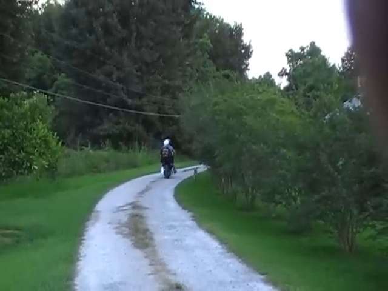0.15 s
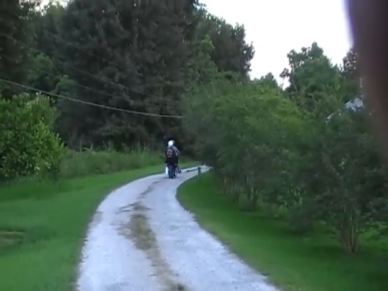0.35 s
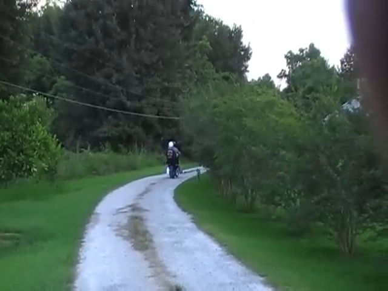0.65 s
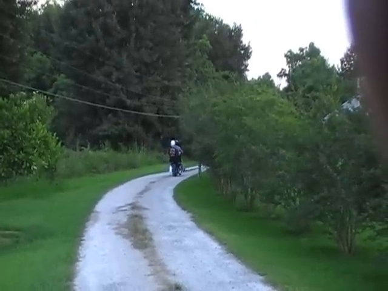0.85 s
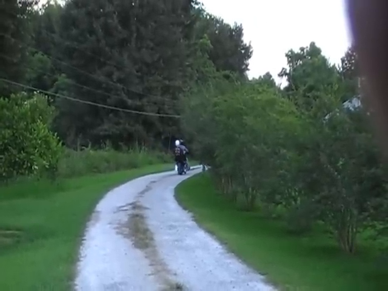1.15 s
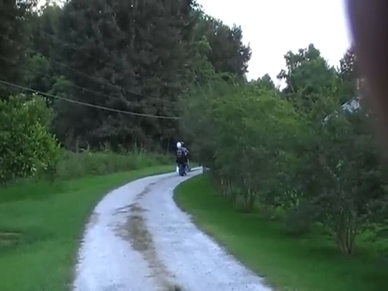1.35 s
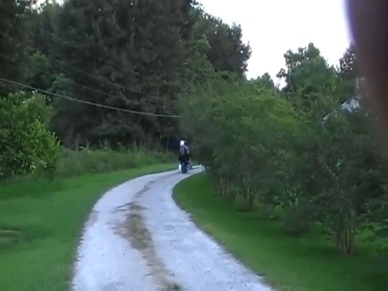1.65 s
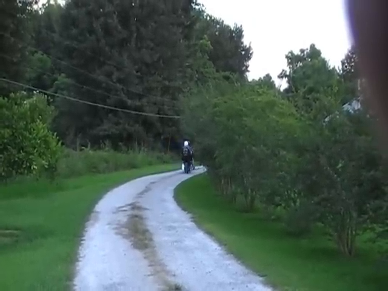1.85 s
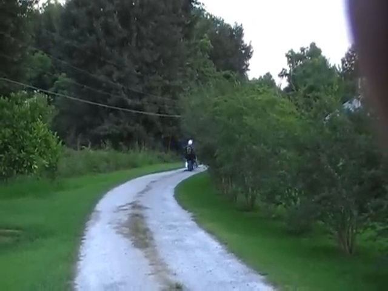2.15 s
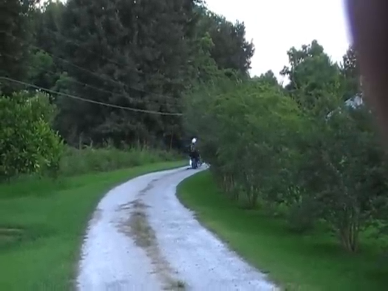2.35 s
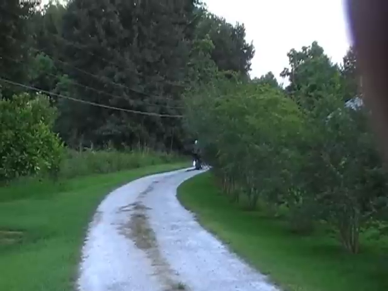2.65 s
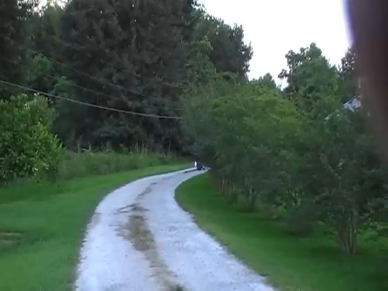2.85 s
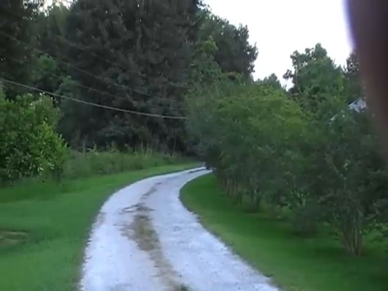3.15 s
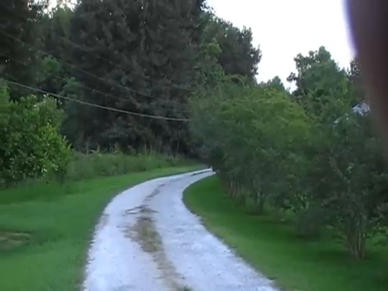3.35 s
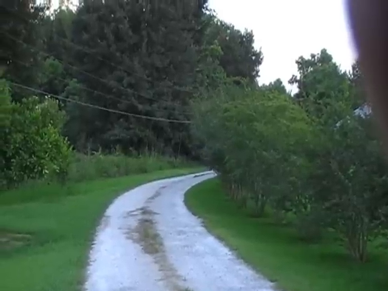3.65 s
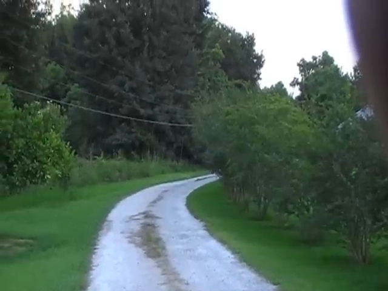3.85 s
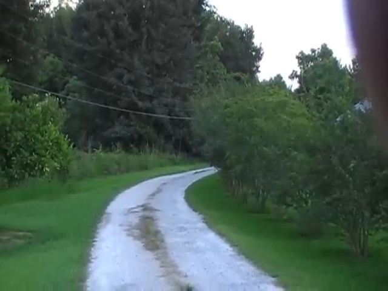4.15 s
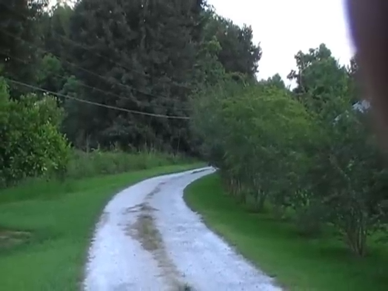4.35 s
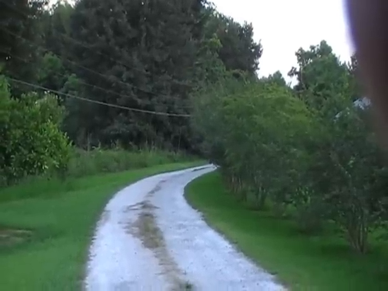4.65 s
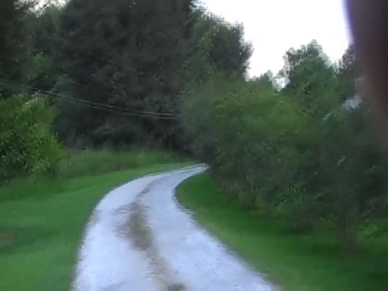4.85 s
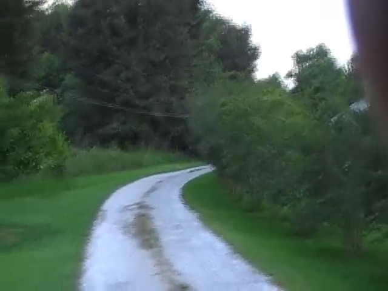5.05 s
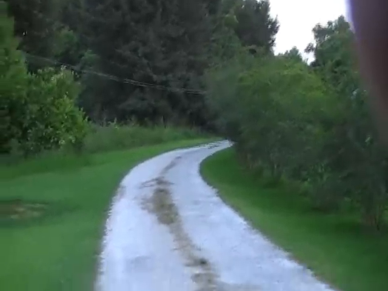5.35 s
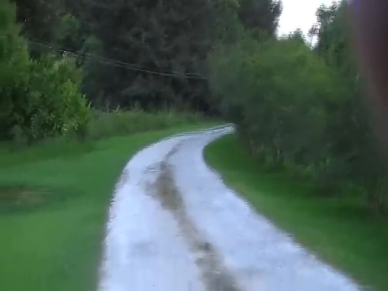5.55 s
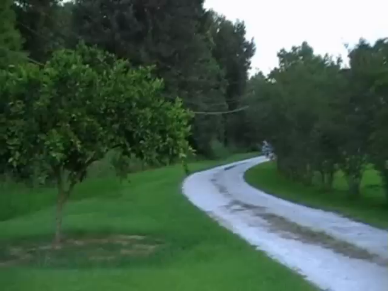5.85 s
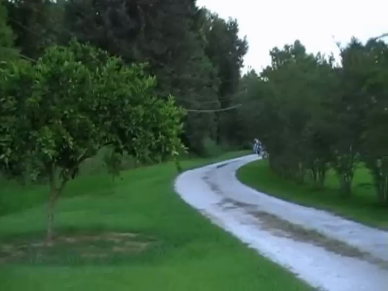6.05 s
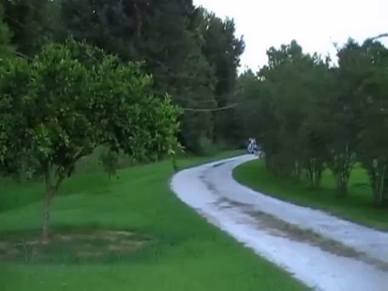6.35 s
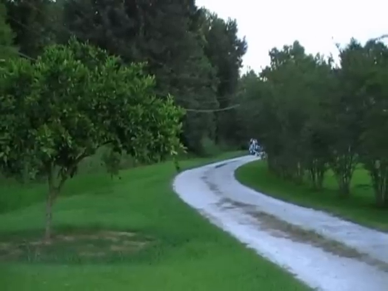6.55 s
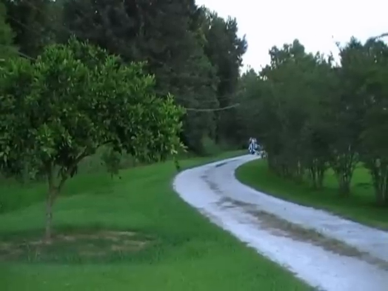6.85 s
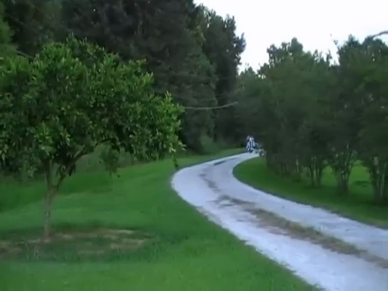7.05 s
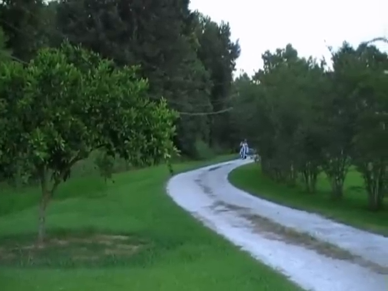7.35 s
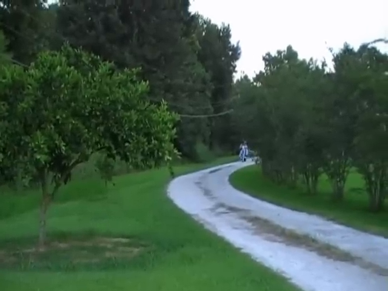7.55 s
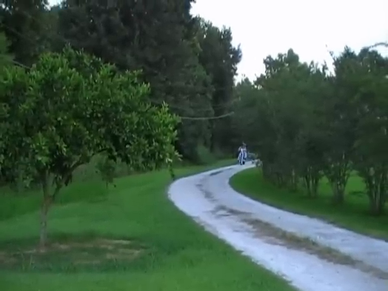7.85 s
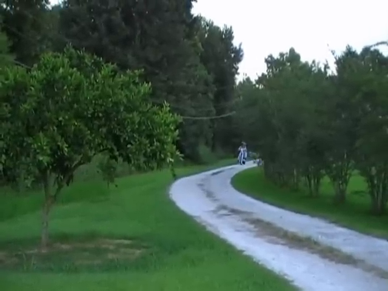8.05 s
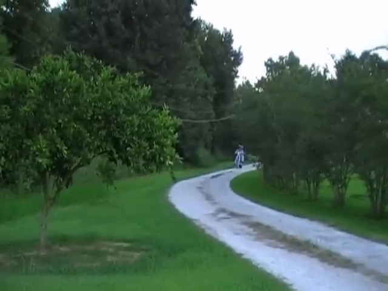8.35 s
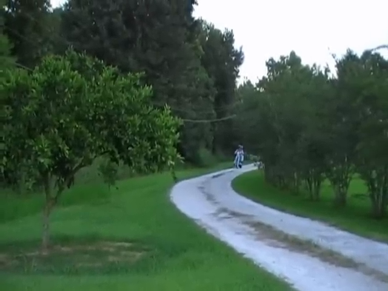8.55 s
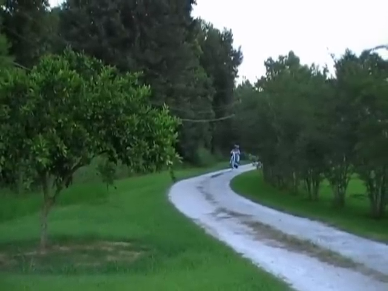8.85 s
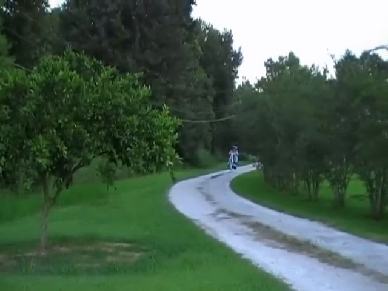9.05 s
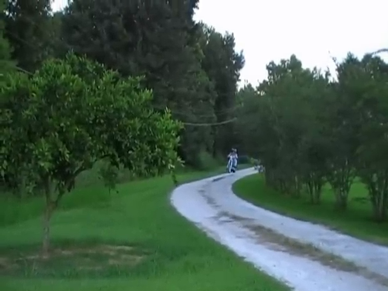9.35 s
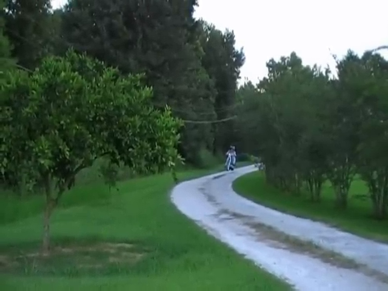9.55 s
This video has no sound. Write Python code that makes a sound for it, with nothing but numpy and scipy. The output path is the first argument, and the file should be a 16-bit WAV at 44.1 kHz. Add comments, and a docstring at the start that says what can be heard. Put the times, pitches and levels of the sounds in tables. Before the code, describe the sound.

Uneven lumpy motorcycle firings recede down a gravel lane, cut abruptly to a distant soft engine that swells with throttle, falls and rises again.

```python
"""V-twin chopper on a gravel lane

A V-twin chugs away at low revs between trees, its uneven pairs of firings timed by the engine speed.
Each firing is a bark, a thump and a crack of gas, shaped from noise and pipe resonances; the intake gulps.
Tyres crunch over an engine drone, with hedge calls, an insect trill and brushes on the microphone body.
After a short silence the bike is far off: soft booms and barks through the trees, an opening throttle
that makes them rasp, an outdoor hiss, and at last the ticking valve gear."""
import sys
import numpy as np
from scipy import signal
from scipy.fft import rfft, irfft, next_fast_len
from scipy.io import wavfile
from scipy.ndimage import uniform_filter1d, map_coordinates

SR = 44100
rng = np.random.default_rng(int(sys.argv[2]) if len(sys.argv) > 2 else 0)


def generate_wav(signal):
    """Clip the signal to [-1, 1] and save it as 16-bit WAV at the path in sys.argv[1]."""
    frames = np.transpose(np.atleast_2d(signal))
    scaled = np.clip(frames, -1, 1) * 32767
    pcm = np.round(scaled).astype(np.int16)
    wavfile.write(sys.argv[1], SR, pcm)


N = 427769
TIME = np.arange(N) / SR
SIZE = 4096  # samples in one short sound
AGE = np.arange(SIZE) / SR  # seconds into a short sound
BREAK = (5.92, 5.951)  # silence between the near and the far scene (s)
TOP_HZ = 15900

# Tone of the slug of gas leaving the pipes. Each row: frequency in Hz, relative level in dB.
THUMP_TONE = [(20, -39), (42, -10.5), (62, -4.5), (100, 3.5), (135, -1.5), (190, 0), (270, -4.5),
              (350, -4.5), (440, -14.5), (700, -32), (2000, -63.5)]
# Tone of the bark straight behind the pipes. Each row: frequency in Hz, relative level in dB.
BARK_BEHIND_TONE = [(150, -33), (480, -9.5), (670, 3), (740, -2), (810, 2.5), (865, -4), (925, -7.5),
                    (1030, -20.5), (1190, -24.5), (1500, -22), (3500, -33), (7000, -97)]
# Tone of the bark past the bend. Each row: frequency in Hz, relative level in dB.
BARK_ASIDE_TONE = [(150, -40.5), (510, -10), (650, 1), (730, -3.5), (790, 2.5), (860, -7.5), (945, -1),
                   (1030, -9.5), (1180, -27), (1500, -22), (3500, -25), (7000, -85)]
# Upper pipe resonances. Each row: frequency in Hz, relative level in dB.
BLARE_TONE = [(1000, -41), (1250, -8), (1520, -1), (1720, -4), (1920, -11), (2250, -1.5), (2600, -11),
              (3400, -21), (7000, -70)]
# Loudness of the blare. Each row: time in seconds, level in dB.
BLARE_LEVEL = [(0, -42.5), (.9, -41), (1.3, -43), (2, -50), (3.6, -49.5), (4.5, -49), (5.9, -48)]
# Tone of the crack straight behind the pipes. Each row: frequency in Hz, relative level in dB.
CRACK_BRIGHT_TONE = [(880, -48), (1500, -2), (1960, -10), (2300, -5), (3000, -7), (4780, 0.5), (5940, 1),
                     (6890, 5), (9280, 4.5), (11500, -7), (14500, -11.5), (16000, -20)]
# Tone of the crack round the bend. Each row: frequency in Hz, relative level in dB.
CRACK_DULL_TONE = [(880, -38), (1500, -25), (1920, -2), (2270, 4), (2910, 9), (4780, 12.5), (5830, 8),
                   (6500, 10.5), (8300, 7.5), (11500, -5.5), (16000, -12.5)]
# Pipe ring after every firing. Each row: frequency in Hz, level over the blow in dB, t60 in seconds.
PIPE_MODES = [(61.4, -25, 0.11), (128, -18, 0.086), (205, -15, 0.1), (336, -12.5, 0.13), (498, -21, 0.11),
              (650, -12.5, 0.059), (793, -13.5, 0.18), (942, -15.5, 0.11)]
# Inlet ring as the throttle opens. Each row: time in seconds, level over the gulp in dB.
INLET_RING_LEVEL = [(0, -12), (3.5, -13), (4.6, -0.5), (5.9, -5.5), (6, -12)]

# Engine speed chugging away. Each row: time in seconds, speed in rpm.
NEAR_SPEED = [(0.02, 1064.4), (0.19, 959.3), (0.35, 1042.6), (0.82, 1003.3), (1.33, 1030.0), (1.7, 1085.6),
              (2.04, 1046.1), (2.5, 1054.2), (2.63, 980.2), (2.84, 1142.6), (2.95, 980.6), (3.22, 1078.3),
              (3.33, 978.3), (3.66, 1019.5), (3.8, 994.3), (4.27, 1073.6), (4.5, 1049.8), (5.92, 1134.5)]
# Engine speed revving far off. Each row: time in seconds, speed in rpm.
FAR_SPEED = [(5.97, 1041.3), (6.6, 1165.9), (7.0, 1488.8), (7.18, 1740.6), (7.46, 1959.2), (8.14, 1583.1),
             (8.57, 1421.1), (8.7, 1294.6), (9.3, 1170.8), (9.7, 1740.6)]
# Firings that miss or burn hard. Each row: time in seconds, change of thump or boom in dB,
# change of crack or far bark in dB; the near bark takes the mean of both changes.
ODD_FIRINGS = [(.137, -3, 2), (.258, 0.5, 2), (.308, 1, 3.5), (.658, -2.5, -5), (1.085, -2, -0.5),
               (1.247, -6, -2), (1.317, -1, 3), (1.48, -4, -4.5), (1.883, 0.5, 3), (2.04, -8, -5.5),
               (2.34, -2.5, 2), (2.389, 1.5, 3.5), (2.502, 2.5, -5), (2.8, 2.5, 2.5), (2.909, 1, 1.5),
               (3.03, -1.5, 3), (3.146, 1.5, 1), (3.194, -1, 1), (3.31, -3, -1.5), (3.546, -11, -10),
               (3.62, 0, 2.5), (3.671, 0.5, 3), (3.977, 0, 5), (4.252, 2.5, 3.5), (5.436, -3, 3),
               (5.758, -2, -2.5), (5.803, 0.5, -3), (6.985, -3, -3), (7.14, 2, -2), (7.207, 1, 1),
               (7.41, -1, 3), (7.725, -4, -1), (8.142, 0.5, -6), (8.295, -1.5, -4), (8.457, -2, -17),
               (8.49, 7.5, 5), (8.54, 3, -1), (8.575, 0, -14), (8.624, -10, -18), (8.662, 3, 2),
               (8.905, -21, -24), (8.945, 4, 1), (9.04, -7, -13), (9.2, 3.5, 5), (9.435, 4, 2),
               (9.52, 3, 3), (9.598, 5, 2.5), (9.64, 1, 1)]
# The pipes as the bike recedes and swings with the bends. Each row: time in seconds, thump in dB,
# bark in dB before a trim, crack in dB, second pipe's crack over the first in dB, turned away from 0 to 1.
LEAVING = [(0, -22.5, -27, -33.5, 0.5, 0.22), (.85, -25.5, -28.5, -30, -1.5, 0.28),
           (1.11, -24.5, -29, -26, -1, 0.09), (1.65, -24, -34, -30, -2, 0.28),
           (2.15, -25.5, -37.5, -35.5, 0, 0.77), (2.6, -26, -36.5, -34, -4, 0.65),
           (3.06, -24, -37.5, -31.5, -4, 0.8), (3.75, -26.5, -37.5, -33, -2, 0),
           (4.25, -25, -40, -44, -1, 0.9), (4.7, -22.5, -38.5, -40.5, 1.5, 1),
           (5.9, -24, -37.5, -38.5, -1.5, 0.55)]
# The far engine swelling with two twists of the throttle. Each row: time in seconds, boom in dB,
# bark in dB, drone in dB; boom and drone are levels before a trim.
RETURNING = [(5.97, -49, -45.5, -43), (6.4, -45.5, -44, -43.5), (6.85, -39.5, -43, -42),
             (7.1, -36.5, -46.5, -40.5), (7.42, -34, -47, -37), (7.9, -36, -46.5, -43.5),
             (8.5, -41.5, -49, -43), (8.8, -39.5, -45.5, -46), (9.3, -43, -47.5, -44.5),
             (9.7, -34.5, -37.5, -39)]

# Tree echoes, as long waves pass through the trees. Each row: frequency in Hz, echo level in dB.
ECHO_BAND = [(150, -12), (400, -7), (900, 0)]
# Decay of the tree echoes. Each row: frequency in Hz, t60 in seconds.
TREE_DECAY = [(100, 0.095), (700, 0.42), (3000, 0.11), (10000, 0.084)]
# Near bed. Each row: time in seconds, gravel level in dB, engine drone in dB before a trim.
ROLL_LEVEL = [(0, -46.5, -31), (1.5, -47, -35.5), (3.5, -48, -35.5), (3.85, -45, -35), (4.3, -46, -38),
              (5.9, -47, -39)]
# Tone of tyres on gravel. Each row: frequency in Hz, relative level in dB.
GRAVEL_TONE = [(260, -16), (430, -8), (520, -16), (635, -5.5), (794, -7.5), (1190, -15), (1530, -13),
               (3760, -11), (5620, -15.5), (9480, -9.5), (10700, -11.5), (11500, -25.5), (14600, -22.5),
               (16000, -53)]
# Tone of the near drone. Each row: frequency in Hz, relative level in dB.
NEAR_DRONE_TONE = [(20, -45), (40, -50), (62, 4.5), (100, 3.5), (200, -19), (350, -10.5), (480, -14.5),
                   (700, -25), (1200, -48)]
# Stereo width of the noise. Each row: frequency in Hz, left-right likeness (1 is mono).
ALIKE = [(100, 0.93), (500, 0.85), (1500, 0.74), (5000, 0.75), (9000, 0.023), (14000, 0.046)]
# Band the ground reflection favours as the bike moves. Each row: time in seconds, centre in Hz, lift in dB.
GROUND_LIFT = [(0, 1900, 2.5), (1.2, 1600, 1.5), (2.0, 2400, 3), (2.6, 2600, 5), (3.1, 2900, 4),
               (3.5, 3300, 3), (3.9, 2200, 2), (4.4, 2900, 1.5), (4.9, 3700, 2.5), (5.7, 4100, 2)]

# Faint bird and insect notes. Each row: start in seconds, length in seconds, frequency in Hz,
# glide in Hz, relative level in dB.
NOTES = [(2.0985, 0.011, 1670, -120, -43), (2.95, 0.064, 1330, 2, -60), (3.223, 0.12, 1370, 0, -55),
         (6.69, 0.14, 3080, 300, -62), (6.77, 0.18, 3660, 0, -62), (7.96, 0.21, 3660, 15, -62.5),
         (7.97, 0.22, 4380, 0, -66), (8.08, 0.17, 3510, -20, -64), (9.13, 0.07, 4800, -400, -65),
         (9.17, 0.16, 3660, 50, -63), (9.2, 0.15, 4400, -20, -64)]
# Husky part of the hedge calls. Each row: start in seconds, length in seconds, level in dB.
HUSKY_CALLS = [(6.62, 0.27, -56), (7.89, 0.13, -55), (8.08, 0.23, -63), (9.048, 0.24, -56.5)]
# Fingers brushing the microphone body. Each row: start in seconds, length in seconds, centre in Hz, level in dB.
BRUSHES = [(5.805, 0.045, 810, -40.5), (5.806, 0.014, 2300, -43.5), (6.208, 0.018, 3880, -49.5),
           (6.834, 0.042, 1260, -53)]

# Loudness of the far hiss. Each row: time in seconds, level in dB before a trim.
HISS_LEVEL = [(6, -47), (7.9, -46.5), (8.3, -49), (8.95, -49), (9.2, -47.5), (9.7, -46)]
# Tone of the far hiss. Each row: frequency in Hz, relative level in dB.
HISS_TONE = [(530, -1.5), (900, -1), (1170, -8), (1500, -4.5), (1800, -10), (2300, -5.5), (2850, -5.5),
             (3300, -12.5), (3800, -10), (5500, -7.5), (7490, -9), (8350, -9), (9400, -3), (10400, -2.5),
             (11300, -21), (14400, -19.5), (16000, -45)]
# Tone of the far drone. Each row: frequency in Hz, relative level in dB.
FAR_DRONE_TONE = [(20, -45), (40, -16), (64, -0.5), (100, 1.5), (200, -17), (350, -13.5), (480, -15.5),
                  (700, -18), (1200, -42.5)]
# Tone of the far boom. Each row: frequency in Hz, relative level in dB.
FAR_BOOM_TONE = [(20, -53), (40, -37), (58, -3), (78, 4), (130, -9), (190, -4.5), (270, -6.5), (340, -3.5),
                 (430, -23.5), (700, -47), (4000, -100)]
# Tone of the far bark. Each row: frequency in Hz, relative level in dB.
FAR_BARK_TONE = [(250, -25), (470, -10), (590, -3.5), (655, 5), (760, -16), (950, -21.5), (1400, -31),
                 (4000, -45)]
# The far bike's path. Each row: time in seconds, scale of echo and resonance, rasp over the bark in dB.
FAR_PATH = [(6.0, 0.14, -29), (6.7, 0.23, -17), (6.85, 0.76, -23), (7.3, 1, -13), (8.6, 1, -37),
            (9.2, 1, -13.5), (9.7, 0.66, -11)]
# Pipe note hanging on at high revs. Each row: time in seconds, level over the untrimmed boom in dB.
FAR_HUM_LEVEL = [(6, -12), (6.9, -14), (7.2, -2), (7.5, -9.5), (8.2, -7), (8.8, -16), (9.7, -9)]
# Note of the far bark, climbing as the throttle opens. Each row: time in seconds, frequency in Hz.
FAR_RING_PITCH = [(6, 650), (7.2, 630), (9.0, 639), (9.3, 696), (9.7, 715)]
# Valve gear, heard once the engine faces the listener. Each row: start in seconds, level in dB.
TICKS = [(9.381, -50), (9.422, -54), (9.472, -50.5), (9.510, -54), (9.552, -47), (9.584, -57), (9.626, -50),
         (9.657, -55)]
# Difference between the microphone ports. Each row: frequency in Hz, left minus right in dB.
PORTS = [(40, 0.5), (130, -2.4), (250, -2), (600, -3), (1200, -1.5), (5000, -0.4), (9000, 0)]

NEAR_SPAN, FAR_SPAN = (.0174, 5.92), (5.972, 9.69)  # first firing and end of each scene (s)
PAIR_GAP = .42  # the second cylinder fires this share of a cycle after the first
SECOND_THUMP_DB, SECOND_BARK_DB = -1.5, -6.5  # the second cylinder is the weaker one
FAR_SECOND_BOOM_DB, FAR_SECOND_BARK_DB = -5.5, -3
LIGHT_LOAD = (7.18, 8.45)  # revving freely, the second cylinder burns hard only every third cycle and weakly otherwise (s)
CATCH_DB, WEAK_DB = 5.5, -9
SCATTER_DB, FAR_SCATTER_DB = 1.32, 1.44  # no two firings burn alike
MODE_SPLIT = (380, 480)  # the thump drives the modes below, the bark those above (Hz)
MODE_SCATTER = .018  # the gas is never equally hot, so the ring varies in pitch
BEND = (3.6, 4.3)  # the bike passes behind the hedge (s)
BARK_ROUGH = .5  # turbulent part of each bark, against the clean ring
SLUG_SCATTER, BOOM_SCATTER, PUFF_SCATTER = .02, .02, .029  # spread of slug length, boom and bark pitch
JET_T60 = .09  # s
FULL_GULP_GAP_S = .06  # a shorter gap between the pairs leaves less time to gulp
TAIL_HOP = SR // 4  # the bike moves, so the echoes are new four times a second
BOOM_ECHO, BARK_ECHO = .45, .55  # scattered share of the far sounds, scaled along the path
BOOM_ATTACK_S, BOOM_HOLD_S, SECOND_HOLD_S, BOOM_T60 = .0033, .023, .012, .05  # pipe note in each far chug


def amp(db):
    """Decibels to gain."""
    return 10 ** (np.asarray(db) / 20)


def unit(x):
    """Scale to rms 1."""
    return x / np.sqrt(np.mean(x ** 2) + 1e-20)


def burst(x, length):
    """Scale to the energy of rms 1 held for length seconds."""
    return x * np.sqrt(length * SR / (np.sum(x ** 2) + 1e-20))


def along(points, hz):
    """Read (Hz, value) points on a log frequency axis."""
    f, v = np.transpose(points)
    return np.interp(np.log(hz + 1), np.log(f + 1), v)


def at(rows, times):
    """Each column of a curve at the given times."""
    s, *columns = np.transpose(rows)
    return [np.interp(times, s, column) for column in columns]


def curves(rows):
    """One value per sample for each column after the time."""
    return at(rows, TIME)


def wobble(rate):
    """A smooth random curve with rate knots a second."""
    knots = rng.standard_normal(int(N * rate / SR) + 4)
    return map_coordinates(knots, [TIME * rate])


def filtered(x, response):
    """Shape x with a gain that depends on frequency."""
    m = next_fast_len(N + SR // 2)
    return irfft(rfft(x, m) * response(np.fft.rfftfreq(m, 1 / SR)), m)[..., :N]


def ring(spectrum):
    """The minimum-phase impulse response of a tone: all its energy comes as early as it can."""
    level = along(spectrum, np.fft.rfftfreq(SIZE, 1 / SR))
    cepstrum = irfft(np.log(amp(level)))
    cepstrum[1:SIZE // 2] *= 2
    cepstrum[SIZE // 2 + 1:] = 0
    return irfft(np.exp(rfft(cepstrum)))


def through(x, response):
    """A short sound through an impulse response."""
    return signal.fftconvolve(x, response)[:SIZE]


def scatter(t60):
    """A fresh cloud of dying echoes with energy 1."""
    cloud = rng.standard_normal(SIZE) * amp(-60 * AGE / t60)
    return cloud / np.linalg.norm(cloud)


def note(hz, t60, attack):
    """One dying resonance with energy 1."""
    envelope = amp(-60 * AGE / t60) * (1 - np.exp(-AGE / attack))
    return burst(np.sin(2 * np.pi * hz * AGE) * envelope, 1 / SR)


def add(track, s, sound):
    """Mix a sound into the track at s seconds."""
    start = int(np.clip(round(s * SR), 0, N))
    track[start:start + len(sound)] += sound[:N - start]


def rush(spectrum):
    """Stereo noise of rms 1, nearly mono in the bass."""
    def mid_side_gain(hz):
        turn = np.arccos(np.clip(along(ALIKE, hz), -1, 1)) / 2
        return amp(along(spectrum, hz)) * [np.cos(turn), np.sin(turn)]
    mid, side = filtered(rng.standard_normal((2, N)), mid_side_gain)
    return unit(np.array([mid + side, mid - side]))


def firings(speed, span):
    """Time, cycle, cylinder (0 or 1), low and high dB change per firing: an uneven pair per two crank turns."""
    cycles = np.cumsum(curves(speed)[0]) / (120 * SR)  # rpm to two-turn cycles
    cycles = cycles - np.interp(span[0], TIME, cycles)
    cycle, second = np.divmod(np.arange(2 * int(cycles[-1] + 1)), 2)
    s = np.interp(cycle + PAIR_GAP * second, cycles, TIME)
    extra = np.zeros((2, len(s)))
    for when, low_db, high_db in ODD_FIRINGS:
        if span[0] < when < span[1]:
            extra[:, np.argmin(abs(s - when))] += low_db, high_db
    return [column[s < span[1]] for column in (s, cycle, second, *extra)]


def near_beats():
    """Rows (s, thump dB, bark dB, crack dB, turned away) of the receding bike's firings."""
    s, _, second, low, high = firings(NEAR_SPEED, NEAR_SPAN)
    thump, bark, crack, second_crack, turned = at(LEAVING, s)
    thump = thump + low + second * SECOND_THUMP_DB
    bark = bark + (low + high) / 2 + second * SECOND_BARK_DB
    crack = crack + high + second * second_crack
    levels = np.array([thump, bark, crack]) + SCATTER_DB * rng.standard_normal((len(s), 3)).T
    return np.transpose([s, *levels, np.clip(turned, 0, 1)])


def pipe_ring(thump_db, bark_db):
    """The same standing waves ring on in the pipes after every firing."""
    hz, db, t60 = np.transpose(PIPE_MODES)[:, :, None]
    drive = np.interp(hz, MODE_SPLIT, [thump_db, bark_db]) + 2 * rng.standard_normal(hz.shape)
    hz = hz * np.exp(MODE_SCATTER * rng.standard_normal(hz.shape))
    modes = np.sum(amp(drive + db - 60 * AGE / t60) * np.sin(2 * np.pi * hz * AGE), axis=0)
    fade_in = 1 - np.exp(-AGE / .0016)
    fade_out = np.minimum(1, (AGE[-1] - AGE) * 50)
    return modes * fade_in * fade_out


def exhaust(beats):
    """The opening valve barks and blares; a slug of gas thumps out, tears into a cracking jet, rings the pipes."""
    out = np.zeros(N)
    thump, behind, aside = ring(THUMP_TONE), ring(BARK_BEHIND_TONE), ring(BARK_ASIDE_TONE)
    blare, bright, dull = ring(BLARE_TONE), ring(CRACK_BRIGHT_TONE), ring(CRACK_DULL_TONE)
    # the open end sends the slug back inverted, 2 ms later
    slug = thump - .63 * np.interp(AGE - .002, AGE, thump, left=0)
    valve = np.exp(-((AGE - .0015) / .00044) ** 2 / 2)  # the first sharp pressure wave
    jet_delay_s, jet_rise_s, jet_tail_db = .00064, .0011, -19
    jet_age = np.maximum(AGE - jet_delay_s, 0) / jet_rise_s
    jet_tail = amp(jet_tail_db - 60 * AGE / JET_T60) * (AGE > jet_delay_s)
    jet = jet_age * np.exp(1 - jet_age) + jet_tail  # tears open, then fades
    for s, thump_db, bark_db, crack_db, turned in beats:
        stretch = np.exp(rng.normal(0, SLUG_SCATTER))  # no two slugs are equally long
        add(out, s + .0026, amp(thump_db) * burst(np.interp(AGE * stretch, AGE, slug), .012))
        add(out, s - .0017, -amp((thump_db + bark_db) / 2 + 7) * valve)

        hidden = np.interp(s, BEND, [0, 1])
        pipe = burst((1 - hidden) * behind + hidden * aside, 1 / SR)
        rough = burst(through(scatter(t60=.096), pipe), 1 / SR)
        add(out, s - .0006, amp(bark_db - 1.4) * burst(BARK_ROUGH * rough - pipe, .011))
        add(out, s + .00473, pipe_ring(thump_db, bark_db))

        blast = scatter(t60=.013) + .79 * scatter(t60=.18)
        add(out, s, amp(at(BLARE_LEVEL, s)[0]) * burst(through(blast, blare), .0086))

        # the jet is a string of tiny shocks
        spiky = rng.standard_normal(SIZE) * amp(1.23 * rng.standard_normal(SIZE))
        crack = through(jet * spiky, (1 - turned) * bright + turned * dull)
        crack = amp(crack_db) * burst(crack, .009)
        add(out, s, crack)
        slap_s = .0105 * np.exp(rng.normal(0, .1))
        add(out, s + slap_s, amp(-19) * crack)  # the hedge slaps it back
    return out


def intake(beats, gulp_db, lag, overlap_db, gulp_hz, cycles, quicken):
    """In the long gap after each uneven pair, the intake gulps and rings briefly; lag is a share of the gap."""
    out, times = np.zeros(N), np.array(beats)[:, 0]
    middle = AGE - .02  # seconds from the heart of the gulp
    for before, s, after in zip(times, times[1:], times[2:]):
        if after - s > 1.15 * (s - before):
            gap = min(after - s, .07)
            fill = min(gap / FULL_GULP_GAP_S, 1) ** 2
            turns = middle * gulp_hz * np.exp(rng.normal(0, .072))
            # a short swing of air in the inlet tract, quickening as the valve shuts
            swing = np.cos(2 * np.pi * (turns + quicken * turns ** 2))
            gulp = -burst(swing * np.exp(-(turns / cycles) ** 2 / 2), .012) * fill
            add(out, s + lag * gap + middle[0], amp(gulp_db + rng.normal(0, 1)) * gulp)
            inlet = burst(note(hz=234, t60=.045, attack=.0012), .0068) * fill
            add(out, s + lag * gap + .0012, amp(gulp_db + at(INLET_RING_LEVEL, s)[0]) * inlet)
            # a smaller puff while the valves overlap
            add(out, s + .38 * gap + middle[0], amp(gulp_db + overlap_db) * gulp)
    return out


def trees(x):
    """The tree line returns a thin, ever-changing tail, different at each microphone port."""
    out = np.zeros((2, N))
    late = np.pad(filtered(x, lambda hz: amp(along(ECHO_BAND, hz))), (300, 0))  # 300 samples later
    for start in range(0, N, TAIL_HOP):
        hz, t, z = signal.stft(rng.standard_normal((2, SR // 2)), SR, nperseg=256)
        decay = amp(-60 * t / along(TREE_DECAY, hz)[:, None])
        tail = signal.istft(z * decay, SR, nperseg=256)[1]
        tail = tail + 2.1 * tail.mean(axis=0)  # the ports are close together, so they share much
        tail = tail / np.linalg.norm(tail) * np.sqrt(2)
        echo = signal.fftconvolve(late[None, start:start + TAIL_HOP], tail, axes=1)
        for port, sound in zip(out, echo):
            add(port, start / SR, sound)
    return out


def near_bed():
    """Tyres crunch on the gravel, as unsteady noise, over the engine's diffuse drone."""
    gravel_db, drone_db = curves(ROLL_LEVEL)
    grit = amp(1.6 * wobble(300) + .86 * wobble(17))
    crunch = unit(grit * rush(GRAVEL_TONE))
    return amp(gravel_db) * crunch + amp(drone_db - 5) * rush(NEAR_DRONE_TONE)


def foliage(x, patchy_db, far_patchy_db):
    """Ground and leaves lift some treble bands and shade others, slowly shifting."""
    hz, t, z = signal.stft(x, SR, nperseg=256)
    s, centre, lift_db = np.transpose(GROUND_LIFT)
    near = t < BREAK[0]
    octaves = np.log2((hz[:, None] + 1) / np.interp(t, s, centre))
    ground = np.interp(t, s, lift_db) * np.exp(-(octaves / .22) ** 2 / 2) * near
    patches = uniform_filter1d(rng.standard_normal(z.shape[1:]), size=3, axis=0)
    patches = unit(uniform_filter1d(patches, size=50, axis=1))
    treble = np.interp(hz, [800, 2000, 10000], [0, 1, .5])[:, None]
    shade = np.where(near, patchy_db, far_patchy_db) * patches * treble
    return signal.istft(z * amp(ground + shade), SR, nperseg=256)[1][:, :N]


def wildlife():
    """Short gliding tones and husky noise call from the hedge; an insect starts a thin, fluttering trill."""
    out = np.zeros(N)
    for s, length, hz, glide_hz, db in NOTES:
        count = int(length * SR)
        part = np.linspace(0, 1, count)
        pitch = (hz + glide_hz * part) * (1 + .0029 * wobble(69)[:count])
        tone = np.sin(2 * np.pi * np.cumsum(pitch) / SR)
        envelope = np.interp(part, [0, .2, 1], [0, 1, 0])
        add(out, s, 2 * amp(db + 3.2 * wobble(41)[:count]) * envelope * tone)
    husk = rush([(2800, -40), (3600, -4), (4450, 0), (5200, -7), (6500, -40)])
    calls = np.zeros(N)
    for s, length, db in HUSKY_CALLS:
        calls += amp(db) * np.sin(np.pi * np.clip((TIME - s) / length, 0, 1))
    buzz = rush([(6900, -60), (7350, -14), (7500, 15), (7640, -12), (8100, -60)])
    trill = unit(amp(3 * wobble(25)) * buzz)
    return out + calls * husk + amp(-64) * np.interp(TIME, [7.2, 8.1], [0, 1]) * trill


def handling():
    """Brief scratchy brushes on the microphone body: spiky noise through a narrow resonance."""
    out = np.zeros(N)
    for s, length, hz, db in BRUSHES:
        grains = rng.standard_normal(SIZE) ** 3 * (AGE < length)
        body = ring([(hz / 2, -20), (hz, 0), (2 * hz, -20), (8 * hz, -50)])
        add(out, s, amp(db) * burst(through(grains, body), length))
    return out


def far_bed():
    """Soft outdoor hiss, slightly unsteady, and the far drone."""
    hiss_db, drone_db = curves(HISS_LEVEL)[0], curves(RETURNING)[-1]
    hiss = amp(hiss_db - 1 + .77 * wobble(60)) * rush(HISS_TONE)
    return hiss + amp(drone_db - 3) * rush(FAR_DRONE_TONE)


def far_beats():
    """Rows (s, boom dB, bark dB, cylinder); under light load the second cylinder burns weakly two cycles in
    three and hard on the third."""
    s, cycle, second, low, high = firings(FAR_SPEED, FAR_SPAN)
    boom, bark, _ = at(RETURNING, s)
    light = (s > LIGHT_LOAD[0]) * (s < LIGHT_LOAD[1])
    load_db = second * light * np.where(cycle % 3 == 2, CATCH_DB, WEAK_DB)
    boom = boom + low + second * FAR_SECOND_BOOM_DB
    bark = bark + high + second * FAR_SECOND_BARK_DB
    levels = np.array([boom, bark]) + load_db + FAR_SCATTER_DB * rng.standard_normal((len(s), 2)).T
    return np.transpose([s, *levels, second])


def far_exhaust(beats):
    """From the front the beats arrive as round, rising booms and dull barks; they rasp as the throttle opens."""
    out = np.zeros(N)
    boom, bark = burst(ring(FAR_BOOM_TONE), 1 / SR), burst(ring(FAR_BARK_TONE), 1 / SR)
    rasp = ring([(500, -25), (850, 9), (1200, -18), (1600, -14), (2600, -10), (4000, -11),
                 (10000, -13), (13000, -36)])
    # the low part of each boom arrives first: pitch climbs by 0.7 of itself in 36.6 ms
    glide = np.cumsum(1 + .7 * np.minimum(AGE / .0366, 1)) / SR

    def echoed(beat, share, t60):
        """A beat with its own scattered copy."""
        return beat + share * burst(through(scatter(t60), beat), 1 / SR)

    for s, boom_db, bark_db, second in beats:
        wet, rasp_db = at(FAR_PATH, s)
        hum = note(hz=195, t60=.09, attack=.008)
        add(out, s, amp(boom_db + at(FAR_HUM_LEVEL, s)[0]) * burst(hum, .02))

        hold = SECOND_HOLD_S if second else BOOM_HOLD_S
        swell = (1 - np.exp(-AGE / BOOM_ATTACK_S)) * amp(-60 * np.maximum(AGE - hold, 0) / BOOM_T60)
        start_hz = 162 * np.exp(rng.normal(0, BOOM_SCATTER))
        pipe = burst(swell * np.sin(2 * np.pi * start_hz * glide), 1 / SR)
        chug = echoed(boom, BOOM_ECHO * wet, t60=.078) + 2.2 * wet * pipe
        add(out, s - .0035, amp(boom_db + 1) * burst(chug, .031))

        # each bark a little higher or lower
        puff = burst(np.interp(AGE * np.exp(rng.normal(0, PUFF_SCATTER)), AGE, bark), 1 / SR)
        bark_ring = note(hz=at(FAR_RING_PITCH, s)[0], t60=.1, attack=.002)
        puff = echoed(puff, BARK_ECHO * wet, t60=.2) + .39 * wet * bark_ring
        add(out, s - .002, amp(bark_db) * burst(puff, .032))
        add(out, s, amp(bark_db + rasp_db) * burst(through(scatter(t60=.06), rasp), .051))
    return out


def valve_ticks():
    """Dry, sharp clacks of the rocker arms, with a short rattle after each."""
    out = np.zeros(N)
    cover = ring([(700, -25), (1400, -6), (2300, 0), (2900, -6), (4500, -20), (12000, -32)])
    for s, db in TICKS:
        clack = scatter(t60=.014) + amp(-9) * scatter(t60=.06)
        add(out, s, amp(db) * burst(through(clack, cover), .01))
    return out


def scene():
    """The bike leaving, then the bike far off."""
    close, distant = near_beats(), far_beats()
    leaving = exhaust(close)
    leaving = leaving + intake(close, gulp_db=-31.5, lag=.51, overlap_db=-11, gulp_hz=137,
                               cycles=.22, quicken=.29)
    far = far_exhaust(distant) + valve_ticks()
    far = far + intake(distant, gulp_db=-39.5, lag=.5, overlap_db=-16, gulp_hz=165,
                       cycles=.97, quicken=.22)
    first = leaving + amp(-13.5) * trees(leaving) + near_bed()
    second = far + amp(-10.5) * trees(far) + far_bed()
    outdoors = foliage(np.where(TIME < BREAK[1], first, second), patchy_db=2.13, far_patchy_db=1.46)
    return outdoors + wildlife() + handling()


def record(dry):
    """Two slightly different ports, a deep bass cut, silence between the two scenes and a sharp top limit."""
    def port_gain(hz):
        balance = amp(np.outer([.5, -.5], along(PORTS, hz)))
        return balance * amp(along([(22, -25), (50, .5)], hz))
    ports = filtered(dry, port_gain)
    running = (TIME < BREAK[0]) | (TIME > BREAK[1])
    return filtered(ports * running, lambda hz: hz < TOP_HZ)


dry = scene()
out = record(dry)
generate_wav(out)
```